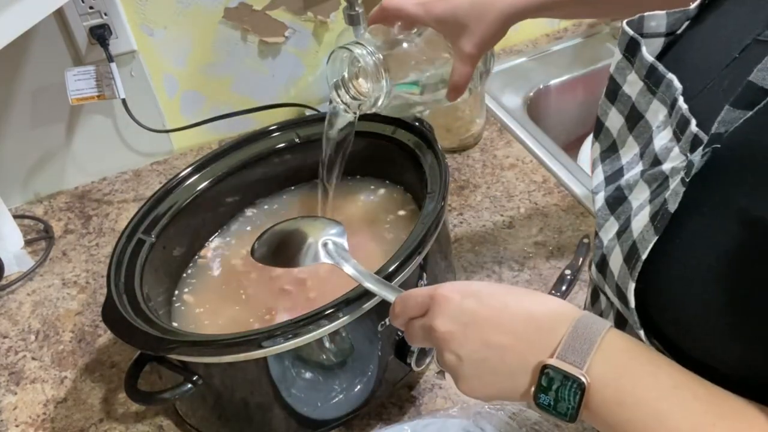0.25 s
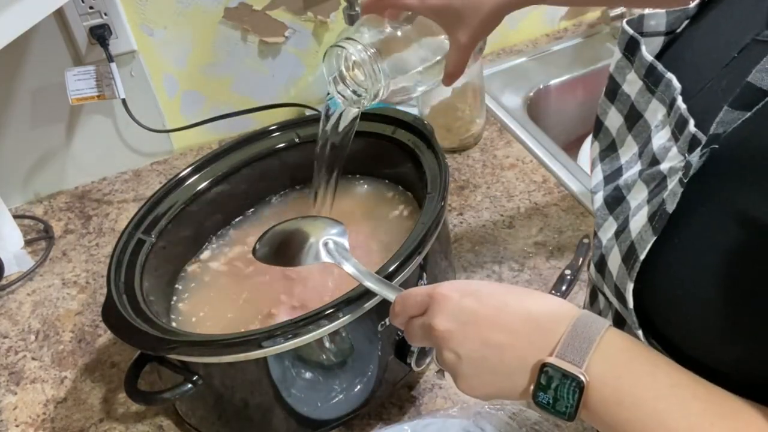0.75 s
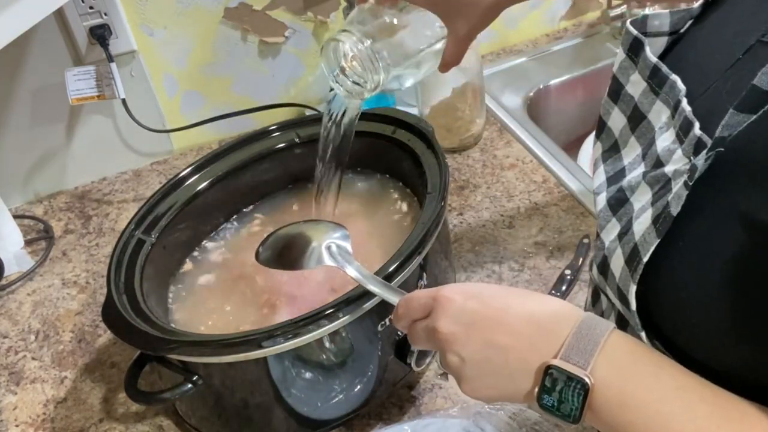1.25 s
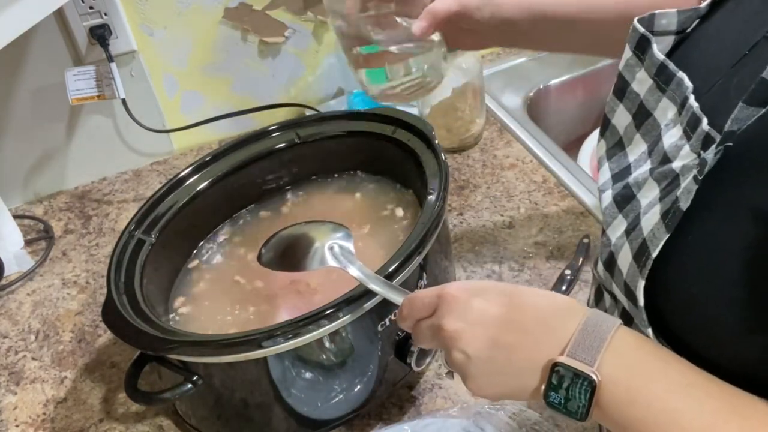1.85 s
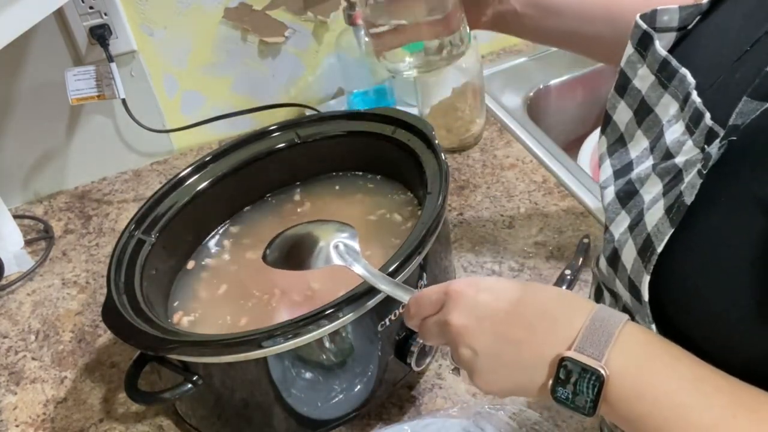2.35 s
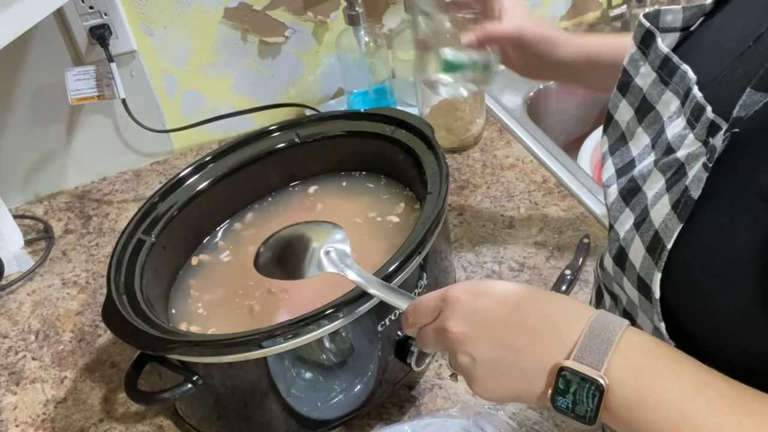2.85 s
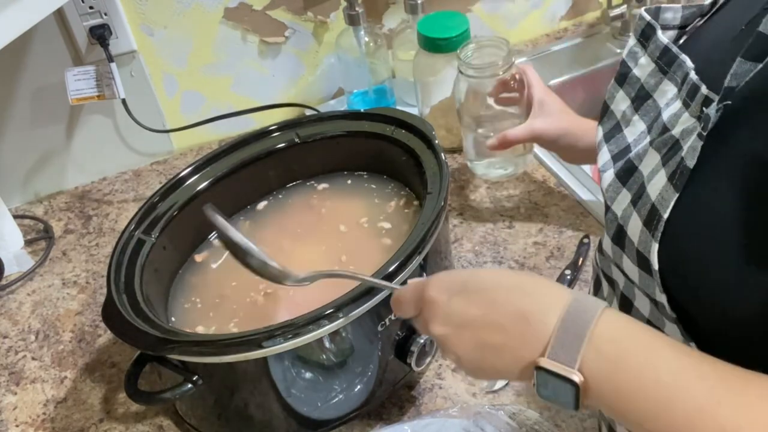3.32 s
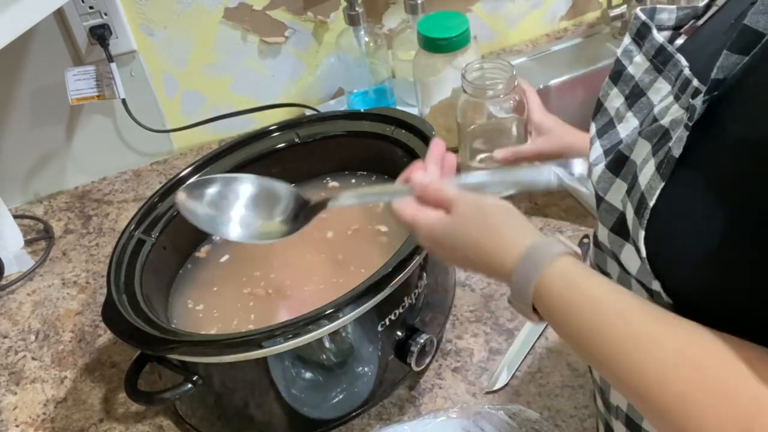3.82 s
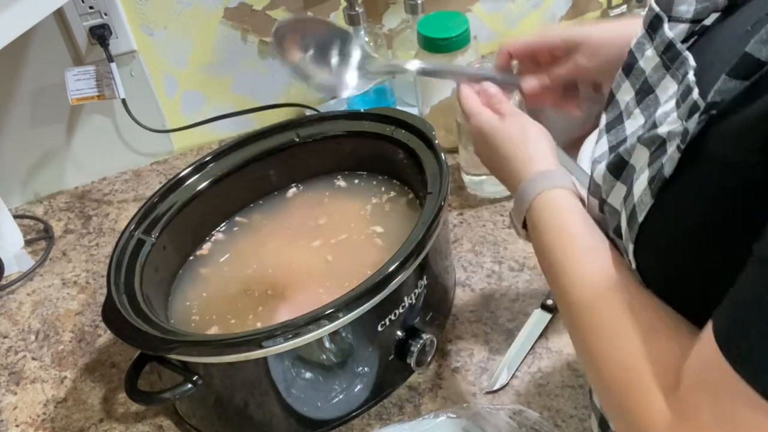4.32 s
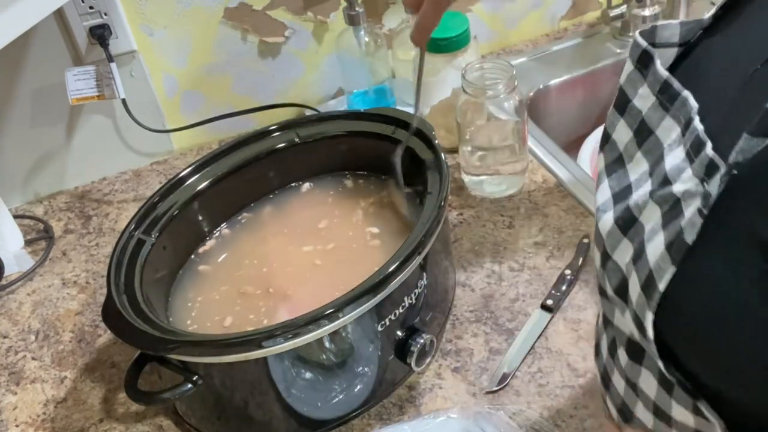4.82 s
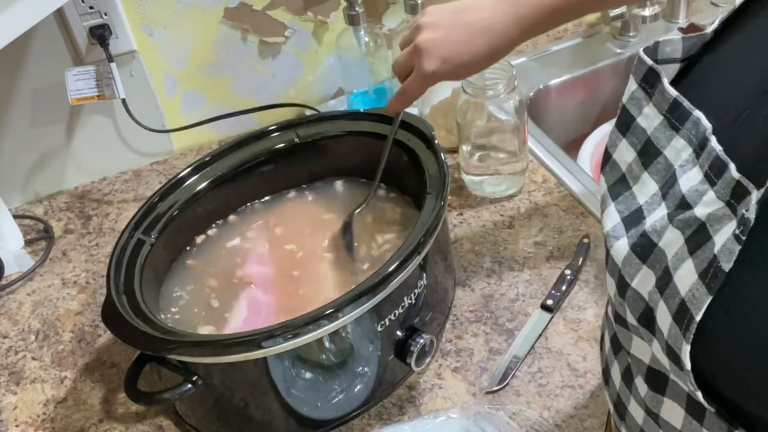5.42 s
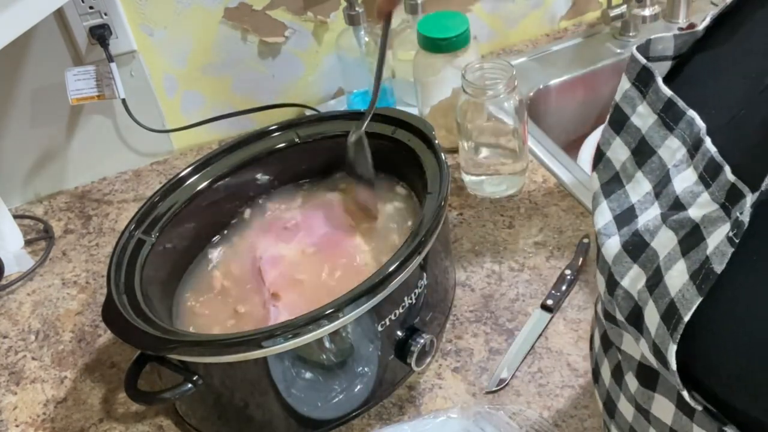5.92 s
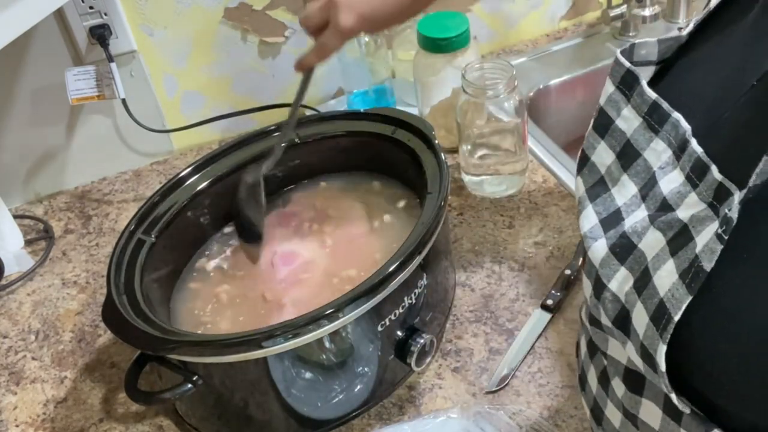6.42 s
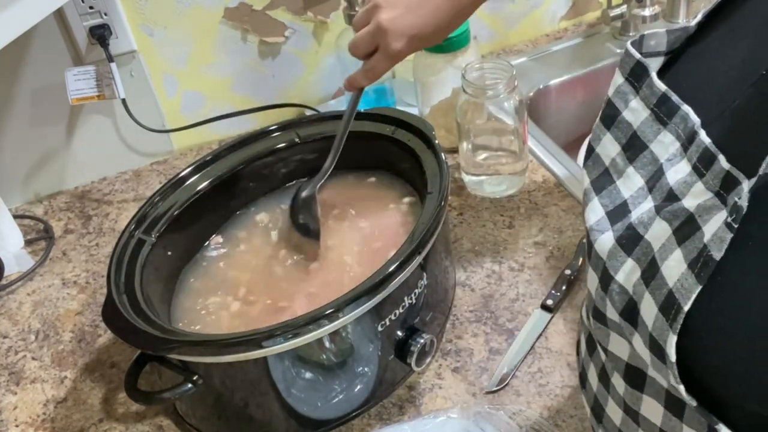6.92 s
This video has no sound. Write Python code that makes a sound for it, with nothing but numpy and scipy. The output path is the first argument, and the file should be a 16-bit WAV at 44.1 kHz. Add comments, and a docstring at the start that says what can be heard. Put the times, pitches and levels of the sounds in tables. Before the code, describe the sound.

Water pours from a glass jar into broth, then the jar thuds on a counter and a steel spoon clinks and stirs.

```python
"""Topping up a pot of broth

Water poured from a glass jar drags air into broth in a stoneware pot: bubbles ring, spray fizzes.
The jar lands hard and sets a stone counter ringing. A steel spoon clinks on the pot, scrapes its
wall and stirs. A tap drips in the sink, an appliance hums, and hard kitchen walls reverberate."""
import sys
import numpy as np
from scipy import signal
from scipy.fft import rfft, irfft, next_fast_len
from scipy.io import wavfile
from scipy.ndimage import uniform_filter1d, map_coordinates

SR = 44100
rng = np.random.default_rng(int(sys.argv[2]) if len(sys.argv) > 2 else 0)


def file_out(sig):
    """Save sig as 16-bit WAV at sys.argv[1]."""
    # one column per channel
    cols = np.atleast_2d(sig).T
    # limit, then scale
    lim = np.clip(cols, -1, 1)
    pcm = np.round(lim * 32767).astype(np.int16)
    wavfile.write(sys.argv[1], SR, pcm)


N = 316312
TIME = np.arange(N) / SR

# Levels are relative, ahead of each source's gains.
# Stereo width of noise and echoes, wide in the mids, alike in the treble: f/Hz, left-right correlation
STEREO_LIKENESS = [(60, 0.93), (180, 0.51), (550, -0.42), (1650, -0.129), (4970, -0.33), (6500, -0.73),
                   (7700, 0.76), (15000, 1)]
# Decay of kitchen, sink corner, pot hollow: f/Hz, t60/s
KITCHEN_T60 = [(100, 0.87), (500, 0.71), (2000, 0.79), (6000, 0.44), (14000, 0.33)]
SINK_T60 = [(2000, 0.19), (5000, 0.8), (12000, 0.48)]
POT_T60 = [(600, 0.27), (2000, 0.073), (8000, 0.074)]
# Motor tones: f/Hz, level/dB
MOTOR_TONES = [(49, -55), (55, -60.5), (103, -73.5)]
# Room noise: f/Hz, level/dB
RUMBLE_SPECTRUM = [(15, -33), (25, -17), (37, -10.5), (59, 5), (76, -8), (107, -10.5), (140, -18.5),
                   (210, -17.5), (288, -17.5), (432, -31), (900, -58.5), (1170, -66.5), (1980, -120)]
AIR_SPECTRUM = [(290, -31.5), (500, 2), (1240, -9.5), (2430, -2.5), (4250, -9.5), (8720, -26.5),
                (12300, -21), (15500, -40.5)]
# Tap drops: t/s, level/dB, bubble f/Hz, treble tilt/(dB/oct)
TAP_DROPS = [(1.794, -46.5, 4750, 6.5), (1.899, -39.5, 2750, -8), (2.009, -51.5, 3500, 30),
             (2.0917, -50, 2270, -6), (2.232, -56.5, 4430, -21), (2.4, -51.5, 4700, -9.5),
             (2.5406, -55, 2970, -18), (2.71, -50, 2980, -12.5), (2.8383, -54.5, 2760, -23),
             (3.0042, -50, 4190, -8.5), (3.2756, -55.5, 4840, -11.5), (3.308, -52, 2840, -10.5),
             (3.4345, -51.5, 3260, -22), (3.8395, -44, 2316, -10.5), (3.9284, -51.5, 3180, -7),
             (4.0706, -47, 4630, -22.5), (4.252, -49, 3137, -8), (4.2974, -52, 3113, -9),
             (4.3844, -52, 3350, -23), (4.571, -48, 3324, -11), (4.7033, -41.5, 4025, -12),
             (5.5005, -52, 2296, -7), (5.5947, -52.5, 4490, -6.5), (5.903, -55, 3940, -7),
             (6.052, -50, 3053, -17), (6.2238, -54, 3744, -5.5), (6.377, -53.5, 4885, -12.5),
             (6.5528, -53.5, 4153, -7), (6.698, -52.5, 3045, -26), (6.851, -50, 4380, -9),
             (7.061, -50.5, 2790, -9)]
# Drop spatter: f/Hz, level/dB
SPATTER_SPECTRUM = [(880, -46.5), (1500, -15.5), (2220, -8.5), (2490, -4), (4310, -7), (8880, -13),
                    (11300, -15), (13000, -19), (15500, -31)]
# Broth lapping, spoon scraping: t/s, level/dB
LAP_ENVELOPE = [(5.7, -59.5), (5.904, -75), (6.01, -69), (6.358, -105.5), (6.6, -61), (6.734, -61.5),
                (7.17, -65)]
SCRAPE_ENVELOPE = [(5.1, -45), (5.12, -65), (5.23, -54), (5.256, -65), (5.286, -54.5), (5.374, -51),
                   (5.446, -52.5), (5.49, -82), (5.5, -74.5)]
# Moving broth, spoon impact: f/Hz, level/dB
SWISH_SPECTRUM = [(290, -43), (500, -11.5), (901, -22.5), (1060, -11), (1240, -16.5), (8240, -18),
                  (13000, -24.5), (15500, -55)]
CRACK_SPECTRUM = [(150, -37.5), (320, -8), (700, -6.5), (1500, -2.5), (2600, -4), (4500, -1), (8300, -3.5),
                  (12500, -6.5), (14500, -25.5), (15600, -45.5)]
# Rubbed pot wall: f/Hz, bandwidth/Hz, level/dB
WALL_RESONANCES = [(1045, 17.4, 16), (1560, 67, -2), (2130, 19, -2), (2400, 50, -6)]
# Spoon on pot: t/s, level/dB, brightest f/Hz, crack/dB, rolloff/(dB/oct), attack/s
SPOON_HITS = [(4.8374, -0.5, 2720, -12.5, 7.5, 0.0026), (4.862, -15, 2040, -9.5, 17, 0.0024),
              (4.889, -13.5, 2170, -9, 12, 0.0043), (4.9261, -8.5, 1104, -15, 16.5, .0015),
              (5.0467, -8, 1640, -12, 17, 0.00064)]
# Modes of spoon and pot, of counter: f/Hz, level/dB, t60/s
CLINK_MODES = [(308.4, 0.5, 0.22), (460, -15, 0.1), (614, -17.5, 0.15), (1042, -20, .17), (1071, -18, 0.2),
               (1354, -14.5, .05), (1450, -10, 0.086), (1513, -16.5, .07), (1630, -3.5, 0.03),
               (1840, -4, 0.027), (2170, -15, 0.12), (2065, -16.5, 0.14), (2482, -1.5, 0.034),
               (2845, -11.5, 0.064), (3505, -5.5, 0.03), (4496, -7.5, 0.048), (5206, 0.5, 0.062),
               (5590, -17, 0.14), (6440, -17.5, 0.067), (8200, -2.5, 0.043)]
COUNTER_MODES = [(62.14, -3.5, 0.4), (88.6, 2.5, 0.13), (116, -6.5, .3), (132.1, 0, 0.4),
                 (171.16, -18, 0.22), (218.6, -10.5, 0.42), (241.2, -2.5, 0.09), (339, -13.5, 0.095),
                 (374, -11, 0.15), (413, -15, 0.15), (496.6, -14, 0.18), (640, -11.5, 0.076),
                 (663, -2.5, 0.034), (839, -4.5, 0.048), (1139, -13, 0.061), (1348, -8.5, 0.05),
                 (1557, -10, 0.053), (2350, -10, .035)]
# Pot shaken by the counter: f/Hz, level/dB, t60/s
POT_MODE = (367, -42, 2.17)
# A faint tone near 650 Hz swells into the knock; the jar touches, lands, rocks, settles, bounces:
# t/s, level/dB, brightest f/Hz, thud/dB, rolloff/(dB/oct)
JAR_HITS = [(3.558, -28, 625, -16, 14), (3.567, -19, 650.5, -10, 11.5), (3.573, -13.5, 700, -3.5, 4.5),
            (3.5797, 3.5, 913, 14, 3.5), (3.584, -5.5, 800, 10.5, 2.5), (3.5912, -1.5, 110, 3, 3),
            (3.6799, -7.5, 699.5, 7, 4.5)]
# Thud colour: f/Hz, level/dB
THUD_SPECTRUM = [(24, -47.5), (40, -1), (207, -5), (273, -4), (359, -6.5), (621, -8), (778, -14),
                 (859, -10.5), (3650, -35), (8520, -42.5), (12700, -49.5), (15500, -103)]
# Thud decay: f/Hz, t60/s
THUD_DECAY = [(60, 0.032), (200, 0.49), (700, 0.44), (2500, 0.53), (8000, 0.36)]
# Slow bubbles: t/s, level/dB, start f/Hz, length/s, fractional pitch rise
SLOW_BUBBLES = [(0.253, -56, 1500, 0.046, 0.09), (0.268, -46.5, 2110, 0.055, 0.016),
                (0.354, -55, 934, 0.042, 0.215), (0.366, -53, 1793, 0.037, 0.037),
                (.4, -52, 2060, 0.026, 0.02), (0.532, -57, 1310, 0.049, 0.03),
                (0.631, -59, 1340, 0.02, 0.08), (0.692, -51.5, 1230, 0.058, 0.38),
                (0.73, -51, 1630, .04, 0.17), (1.449, -43.5, 880, 0.0091, 0.39),
                (1.505, -48, 1860, 0.02, -0.04), (0.841, -47, 2320, 0.02, 0.069),
                (.915, -48.5, 2044, 0.017, 0.096), (0.999, -47, 2320, 0.018, 0.019),
                (1.056, -54.5, 1473, 0.025, -0.0027), (1.208, -58, 1454, 0.032, -0.018)]
# Single bubbles: t/s, level/dB, f/Hz, spray/dB
LOUD_BUBBLES = [(0.019, -37.5, 2810, -20), (0.067, -40, 3480, -21), (0.184, -30, 838, -15),
                (0.2322, -36, 4050, -7), (0.2355, -34, 4330, -14), (0.259, -37.5, 2335, -1),
                (0.338, -32.5, 2010, -27), (0.397, -38, 2080, -4), (0.536, -45, 3570, -13),
                (0.565, -38, 4980, -2), (0.583, -40, 1550, -11), (0.691, -49.5, 1390, 9.5),
                (0.724, -36, 2290, -6), (0.786, -38, 4080, -7), (0.818, -41, 2040, -2),
                (0.9, -38, 1850, -2), (0.917, -45, 1460, -3), (0.978, -35.5, 3690, -11),
                (1.037, -39.5, 3650, -23.5), (1.054, -38, 2375, -12), (1.148, -45.5, 790, -19),
                (1.2, -40.5, 3980, -10.5), (1.237, -47, 2590, -22), (1.338, -41, 1530, -6),
                (1.397, -33, 1060, -28), (1.453, -40, 2250, 7), (1.499, -40.5, 2000, -24),
                (1.538, -45, 2450, -6), (1.578, -39.5, 1324, 2.5), (1.621, -44.5, 4420, 7.5),
                (1.59, -43, 3120, -19), (1.651, -35.5, 5020, 0.5), (1.676, -33.5, 1043, -6),
                (1.725, -43.5, 2480, -7), (1.84, -50, 4400, -6), (1.6, -39, 1050, -1),
                (5.736, -43.5, 1344, -21), (5.781, -53, 1390, -6), (5.779, -55, 1730, -15),
                (6.622, -54.5, 1065, 6.5), (6.244, -48, 5100, -4.5), (6.745, -54, 1900, -21.5),
                (5.736, -48.5, 4010, -15), (5.782, -60, 3170, -22), (.189, -34.5, 1110, -14),
                (.287, -42, 1820, -17), (.33, -38, 1540, -22), (1.4905, -36, 4260, -11),
                (1.4972, -31.5, 3545, -8), (1.671, -34, 3474, -11), (1.679, -34, 737, -24),
                (1.7, -47, 610, -22)]
# Air in the emptying jar: t/s, level/dB, f/Hz, length/s
JAR_AIR_TONES = [(0.103, -58, 528, 0.057), (1.507, -55.5, 307, 0.034), (1.818, -71.5, 1861, 0.24)]
# Fizz and spray: f/Hz, level/dB
SPLASH_SPECTRUM = [(600, -14), (1000, 3.5), (1900, -2.5), (3800, 8.5), (5500, 2.5), (9300, 2), (11400, 5),
                   (13900, -4.5), (14600, -50), (15600, -48.5)]
# Poured stream: t/s, flow/dB, bubbling re flow/dB
POUR_ENVELOPE = [(0.0, -46, -12.5), (0.182, -54.5, -12.5), (0.244, -49.5, -7), (0.482, -54, -10),
                 (0.828, -54, -4), (1.292, -58.5, -8.5), (1.484, -48.5, -11.5), (1.498, -43.5, -4.5),
                 (1.556, -61.5, -10), (1.68, -49.5, -10), (1.69, -87, -14), (1.72, -72, -17),
                 (1.85, -60, -25), (2.3, -100, -14)]
# Left channel re right: f/Hz, level/dB
STEREO_BALANCE = [(60, -3), (110, -1.5), (200, 5.5), (380, 6), (800, 0), (2400, 2.5), (5500, -1),
                  (15000, 1.5)]
# Treble swings in and out of phase, hollow near 10 kHz: f/Hz, left channel's lead/cycles
STEREO_PHASE = [(0, 0), (4300, .05), (4900, .6), (6800, .88), (7700, 1), (8500, 1.03), (9600, 1.5),
                (11100, 1.5), (12400, 1.98), (13700, 2.02), (15500, 2.5)]


def amp(db):
    return 10 ** (np.asarray(db) / 20)


def unit_rms(x):
    return x / np.sqrt(np.mean(x ** 2) + 1e-20)


def log_interp(points, hz):
    """Interpolate (f/Hz, value) points on a log axis."""
    f, values = np.transpose(points)
    return np.interp(np.log(hz + 1), np.log(f + 1), values)


def envelopes(rows):
    """Each column per sample, plus a gate open over the table's span."""
    times, *columns = np.transpose(rows)
    gate = uniform_filter1d(1. * ((TIME >= times[0]) & (TIME <= times[-1])), size=2000, mode="nearest")
    return [np.interp(TIME, times, column) for column in columns] + [gate]


def wobble(rate_hz):
    """Smooth random curve."""
    return map_coordinates(rng.standard_normal(int(N * rate_hz / SR) + 4), [TIME * rate_hz])


def filtered(x, response):
    """Apply the gain response(f/Hz)."""
    n = x.shape[-1]
    size = next_fast_len(n + 8192)
    return irfft(rfft(x, size) * response(np.fft.rfftfreq(size, 1 / SR)), size)[..., :n]


def coloured(x, spectrum, tilt_db=lambda f: 0):
    """x shaped by a spectrum and a tilt, rms 1."""
    return unit_rms(filtered(x, lambda f: amp(log_interp(spectrum, f) + tilt_db(f))))


def to_stereo(pair, spectrum):
    """Colour two independent noises and mix them as mid and side."""
    angle = lambda f: np.arccos(np.clip(log_interp(STEREO_LIKENESS, f), -1, 1)) / 2
    mid, side = filtered(
        pair, lambda f: amp(log_interp(spectrum, f)) * [np.cos(angle(f)), np.sin(angle(f))])
    return np.array([mid + side, mid - side])


def noise_tail(t60s, spectrum=((1, 0), (20000, 0)), length_s=.7):
    """Stereo noise, left energy 1, each frequency with its own decay."""
    n = int(length_s * SR)
    hz, t, bins = signal.stft(rng.standard_normal((2, n)), SR, nperseg=256)
    decay = amp(-60 * t / log_interp(t60s, hz)[:, None])
    tail = to_stereo(signal.istft(bins * decay, SR, nperseg=256)[1][:, :n], spectrum)
    return tail / np.linalg.norm(tail[0])


def add(out, at_s, x):
    part = out[..., round(at_s * SR):][..., :x.shape[-1]]
    part += x[..., :part.shape[-1]]


def bubble(t, hz, t60_s, rise):
    """Ringing air pocket: soft onset, pitch climbing as it fades."""
    tone = np.sin(2 * np.pi * hz * t * (1 + rise * t / t60_s))
    return tone * amp(-60 * t / t60_s) * (1 - np.exp(-t * hz / 3))


def swarm(count, centre_hz, octaves, cycles, spread_db, span_s):
    """Small bubbles in clumps, rms 1 over the span."""
    delay, strength, pick = np.hsplit(rng.random((count, 3)), 3)
    clump = rng.random(count // 5)[(pick * (count // 5)).astype(int)]
    start = ((clump * span_s + 0.033 * delay) * SR).astype(int)
    hz = np.clip(centre_hz * 2 ** (octaves * rng.standard_normal((count, 1))), 900, 14000)
    t = np.arange(700) / SR
    bubbles = amp(-spread_db * np.log(strength + 0.0098)) * bubble(t, hz, cycles / hz, rise=0.12)
    x = np.bincount((start + np.arange(len(t))).ravel(), bubbles.ravel(), N)[:N]
    return x / np.sqrt(np.mean(x[:int(span_s * SR)] ** 2))


def struck(modes, t, bright_hz, rolloff_db_oct):
    """Decaying modes; the blow's spot and hardness favour those near bright_hz."""
    out = np.zeros(len(t))
    for hz, db, t60_s in modes:
        mode_db = db - rolloff_db_oct * abs(np.log2(hz / bright_hz)) + rng.normal(0, 2.5)
        out += amp(mode_db - 60 * t / t60_s) * np.sin(2 * np.pi * hz * t)
    return out


def reverb(x, t60s, block_s, delay_s, tail_s):
    """Wall reflections, with a new tail for each block."""
    out, step = np.zeros((2, N)), round(block_s * SR)
    for i in range(0, N, step):
        block = x[None, i:i + step]
        if block.any():
            tail = noise_tail(t60s, length_s=tail_s)
            add(out, i / SR + delay_s, signal.fftconvolve(block, tail, axes=1))
    return out


def background():
    """Motor tones beat and waver over low rumble and faint air."""
    hum = np.zeros(N)
    for hz, db in MOTOR_TONES:
        level = amp(db + 5 + 3.2 * wobble(3.01))
        hum += level * np.sin(2 * np.pi * (hz * TIME + rng.random() + 0.065 * wobble(3.1)))
    rumble = amp(-54.5) * unit_rms(to_stereo(rng.standard_normal((2, N)), RUMBLE_SPECTRUM))
    air = amp(-71) * unit_rms(to_stereo(rng.standard_normal((2, N)), AIR_SPECTRUM))
    return hum + rumble + air


def tap():
    """Drops spatter in a distant steel sink; mostly echo."""
    out, t = np.zeros((2, N)), np.arange(SR // 8) / SR
    for at_s, db, hz, treble_db_oct in TAP_DROPS:
        puff = rng.standard_normal(len(t)) * t / .012 * np.exp(-t / 0.0042)
        flicker = amp(2 * rng.standard_normal(64).repeat(128)[:len(t)])
        tilt_db = lambda f: (treble_db_oct + 7) * np.clip(np.log2(f / 4000 + .01), 0, 1.7)
        spatter = coloured(puff * flicker, SPATTER_SPECTRUM, tilt_db)
        plink = np.roll(bubble(t, hz, t60_s=0.017, rise=.08), 400)
        drop = amp(-19.5) * spatter + amp(-3) * plink
        echo = signal.fftconvolve(drop[None], noise_tail(SINK_T60, length_s=.4), axes=1)
        add(out, at_s - .003, amp(db - 3.5) * drop)
        add(out, at_s - .003, amp(db + 3) * echo)
    return out


def stir():
    """Broth laps round the spoon: thin noise and tiny bubbles."""
    level_db, gate = envelopes(LAP_ENVELOPE)
    lap = coloured(rng.standard_normal(N) * amp(5 * wobble(40)), SWISH_SPECTRUM)
    tiny = swarm(count=1500, centre_hz=3200, octaves=.6, cycles=45, spread_db=1, span_s=7.1)
    return gate * amp(level_db) * (amp(-14) * lap + amp(-13.5) * tiny)


def spoon_scrape():
    """The edge rubs the pot wall into resonance; the broth swishes. Returns ring, swish."""
    ring_db, ring_gate = envelopes(SCRAPE_ENVELOPE)
    swish_db, swish_gate = envelopes([(5.08, -62.5), (5.66, -65.69)])
    friction = rng.standard_normal(N) * amp(2.2 * wobble(50))
    wall = lambda f: sum(amp(db) * 1j * f * width_hz / (hz * hz - f * f + 1j * f * width_hz)
                         for hz, width_hz, db in WALL_RESONANCES)
    ring = unit_rms(filtered(friction, wall))
    swish = coloured(rng.standard_normal(N) * amp(1.5 * wobble(70)), SWISH_SPECTRUM)
    return ring_gate * amp(ring_db) * ring, swish_gate * amp(swish_db) * swish


def spoon_clinks():
    """Steel strikes stoneware. Returns ringing modes, contact cracks."""
    rings, cracks, t = np.zeros(N), np.zeros(N), np.arange(SR // 4) / SR
    for at_s, db, bright_hz, crack_db, rolloff_db_oct, attack_s in SPOON_HITS:
        tilt_db = lambda f: 7.14 * np.log2(bright_hz / 2800) * np.log2(f / 2000 + 0.0036)
        crack = coloured(rng.standard_normal(len(t)), CRACK_SPECTRUM, tilt_db)
        crack *= amp(-60 * t / 0.074) * (1 - np.exp(-t / 0.00057))
        ring = struck(CLINK_MODES, t, bright_hz, rolloff_db_oct) * (1 - np.exp(-t / attack_s))
        add(rings, at_s, amp(db - 9.5) * ring)
        add(cracks, at_s, amp(db + crack_db - 10.5) * crack)
    return rings, cracks


def jar_landing():
    """The jar strikes the counter, which shakes the pot. Returns mono knock, stereo boom."""
    knock, boom, t = np.zeros(N), np.zeros((2, N)), np.arange(int(.8 * SR)) / SR
    for at_s, db, bright_hz, thud_db, rolloff_db_oct in JAR_HITS:
        ring = struck(COUNTER_MODES, t, bright_hz, rolloff_db_oct) * (1 - np.exp(-t * bright_hz))
        add(knock, at_s, amp(db - 5.5) * ring)
        thud = noise_tail(THUD_DECAY, THUD_SPECTRUM)
        add(boom, at_s, amp(db + thud_db) * thud * (1 - np.exp(-t[:thud.shape[1]] / 0.00036)))
    hz, db, t60_s = POT_MODE
    since_landing_s = np.clip(TIME - JAR_HITS[3][0], 0, None)
    pot = amp(db - 60 * since_landing_s / t60_s) * np.sin(2 * np.pi * hz * since_landing_s)
    return knock + pot, boom


def gurgles():
    """Larger air pockets swell and fade, most rising in pitch."""
    out = np.zeros(N)
    for at_s, db, hz, length_s, rise in SLOW_BUBBLES:
        t = np.arange(int(length_s * SR)) / SR
        swell = amp(db - 2.5 + 2.4 * wobble(93)[:len(t)]) * np.sin(np.pi * t / length_s) ** 0.89
        add(out, at_s, swell * np.sin(2 * np.pi * hz * t * (1 + rise * t / length_s / 2)))
    return out


def glugs():
    """Loud bubbles, each with a wet slap near its pitch and a tick of spray. Returns plops, splats."""
    plops, splats, t = np.zeros(N), np.zeros(N), np.arange(SR // 16) / SR
    for at_s, db, hz, spray_db in LOUD_BUBBLES:
        slap_band = lambda f: amp(-9 * abs(np.log2(f / hz + .001)) - 11 * (f < .55 * hz))
        slap = unit_rms(filtered(rng.standard_normal(len(t)), slap_band))
        slap *= amp(-5.5 - 60 * t / 0.026) * (1 - np.exp(-t / 0.0034))
        tilt_db = lambda f: 3.4 * np.log2(f / 4000 + .01)
        spray = coloured(rng.standard_normal(len(t)), SPLASH_SPECTRUM, tilt_db)
        spray *= amp(-60 * t / 0.0043) + amp(-11 - 60 * t / 0.05)
        plop = bubble(t, hz, t60_s=0.03 * (2000 / hz) ** 0.13, rise=0.0092)
        # Pockets split in two; big ones give a louder twin.
        twin = bubble(t, hz * rng.choice([.72, 1.36]), t60_s=0.052, rise=0.24) * 2000 / (2000 + hz)
        add(plops, at_s, amp(db - 1) * plop)
        add(plops, at_s + 0.0043, amp(db - 11.5) * twin)
        add(splats, at_s, amp(db) * (slap + amp(spray_db) * spray))
    return plops, splats


def pour():
    """The stream drags air under: bubble swarms, fizz, flying droplets, soft tones of the jar's air."""
    flow_db, bubbling_db, gate = envelopes(POUR_ENVELOPE)
    crackle = rng.standard_normal(N) * amp(3.8 * wobble(300) + 3.9 * wobble(25.5))
    fizz = coloured(crackle, SPLASH_SPECTRUM)
    large = swarm(count=240, centre_hz=2012, octaves=.385, cycles=90, spread_db=.5, span_s=2.1)
    small = swarm(count=500, centre_hz=1.9 * 2012, octaves=.7, cycles=45, spread_db=1.5, span_s=2.3)
    droplets = swarm(count=260, centre_hz=7500, octaves=.55, cycles=24, spread_db=4.5, span_s=1.75)
    fizz_db = flow_db[0] + 0.86 * (flow_db - flow_db[0]) - 5
    spray = amp(fizz_db) * (fizz + amp(-6) * droplets)
    bubbling = amp(flow_db + bubbling_db) * (large + amp(-0.5) * small)
    out = gate * (spray + bubbling)
    for at_s, db, hz, length_s in JAR_AIR_TONES:
        t = np.arange(int(length_s * SR)) / SR
        swell = amp(db) * np.sin(np.pi * t / length_s)
        add(out, at_s, swell * np.sin(2 * np.pi * hz * t * (1 + 0.05 * t)))
    return out


def scene():
    """All sources, plus the echoes of pot and kitchen."""
    stream = pour() + stir()
    plops, splats = glugs()
    plops += gurgles()
    clinks, cracks = spoon_clinks()
    scrape, swish = spoon_scrape()
    spoon_tones, spoon_noise = clinks + scrape, cracks + swish
    knock, boom = jar_landing()
    direct = stream + plops + splats + spoon_tones + spoon_noise + knock + boom
    pot_echo = amp(-4) * reverb(plops, POT_T60, block_s=.1, delay_s=.002, tail_s=.2)
    room_send = (amp(-2.5) * stream + amp(-10) * plops + amp(-7) * splats
                 + amp(-15) * spoon_tones + amp(-4.5) * spoon_noise
                 + amp(-15) * knock + amp(-10.5) * boom[0])
    room_echo = reverb(room_send, KITCHEN_T60, block_s=1 / 3, delay_s=.004, tail_s=.7)
    return direct + pot_echo + room_echo + tap() + background()


def record(dry):
    """Left-right level and phase offsets, bass cut, soft clip, band limit."""
    bass_hz, top_hz, ceiling = 45, 15700, 1.05
    half = np.array([[.5], [-.5]])
    balance = lambda f: amp(half * log_interp(STEREO_BALANCE, f))
    phase = lambda f: np.exp(2j * np.pi * half * np.interp(f, *np.transpose(STEREO_PHASE)))
    x = filtered(dry, lambda f: balance(f) * phase(f) * (1j * f / (bass_hz + 1j * f)) ** 2.43)
    x = x / (1 + np.abs(x / ceiling) ** 6) ** (1 / 6)
    return filtered(x, lambda f: f < top_hz)


dry = scene()
out = record(dry)
file_out(out)
```